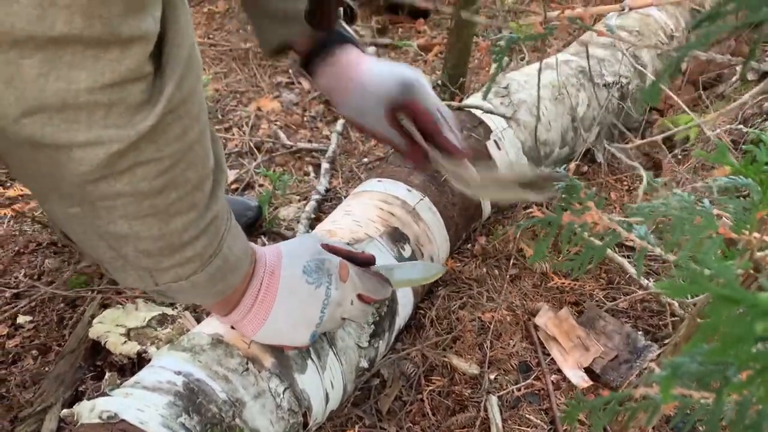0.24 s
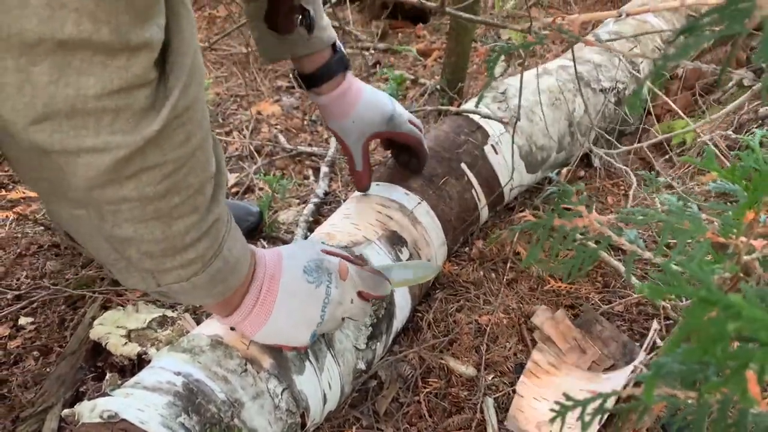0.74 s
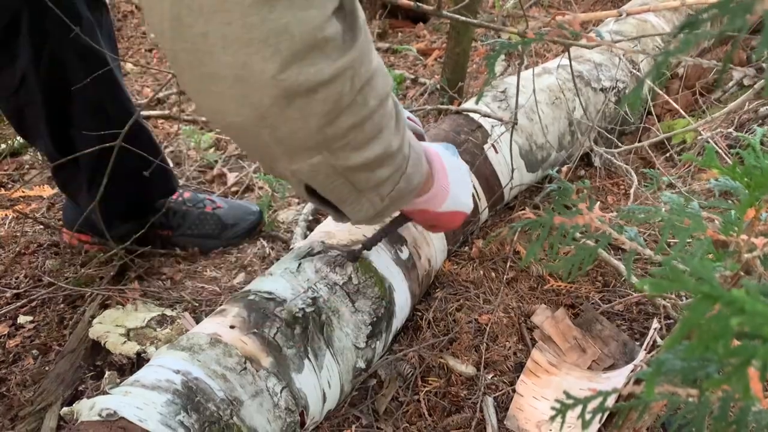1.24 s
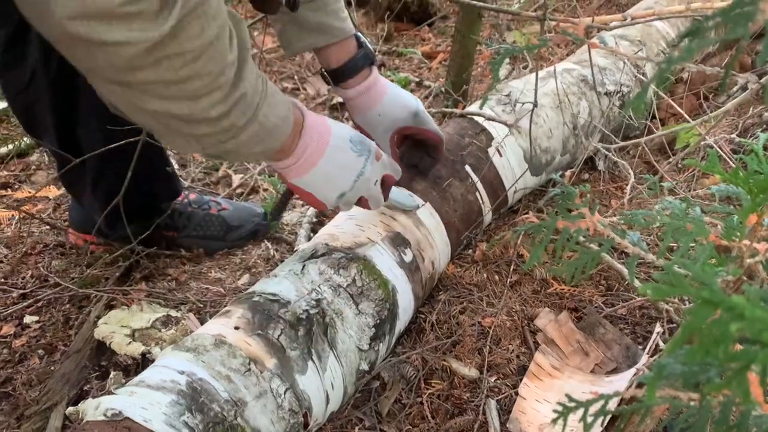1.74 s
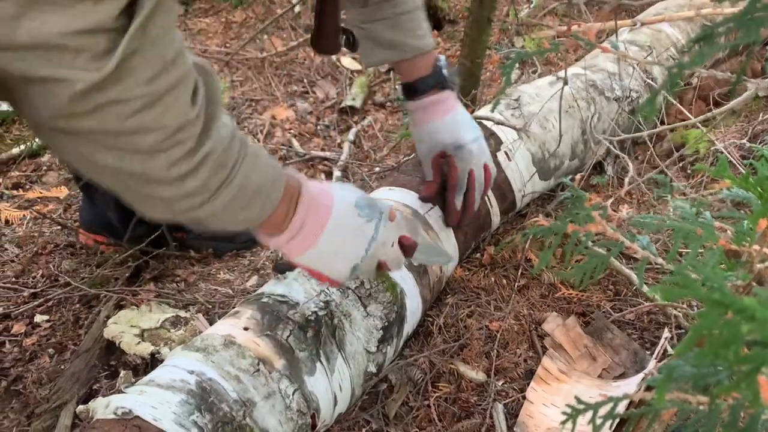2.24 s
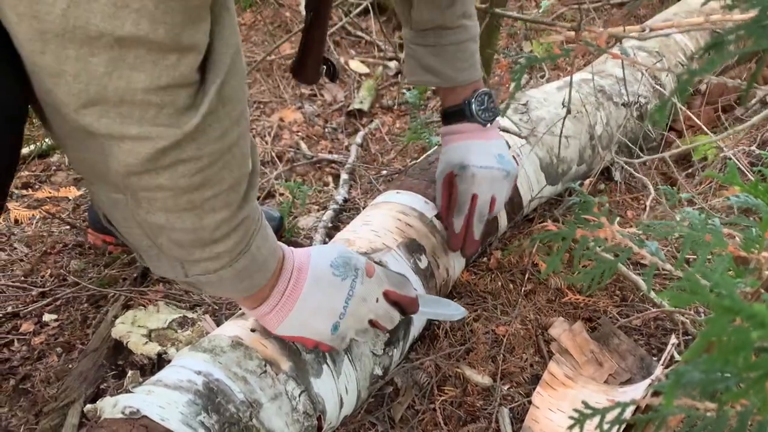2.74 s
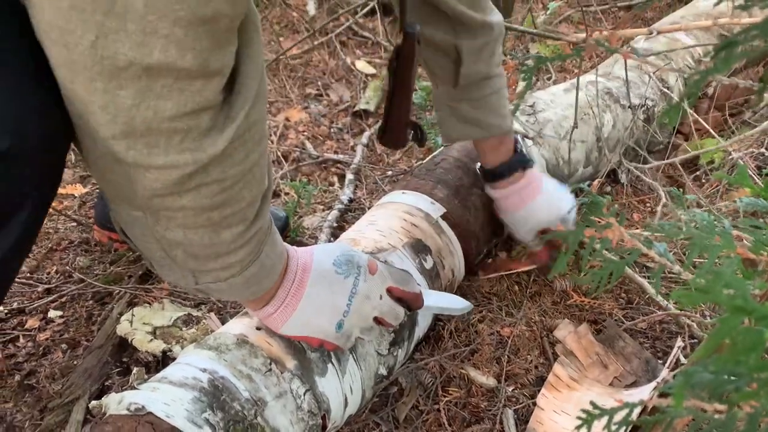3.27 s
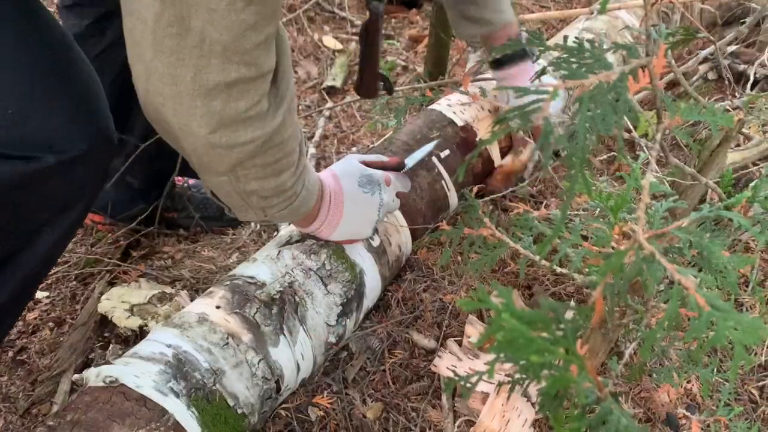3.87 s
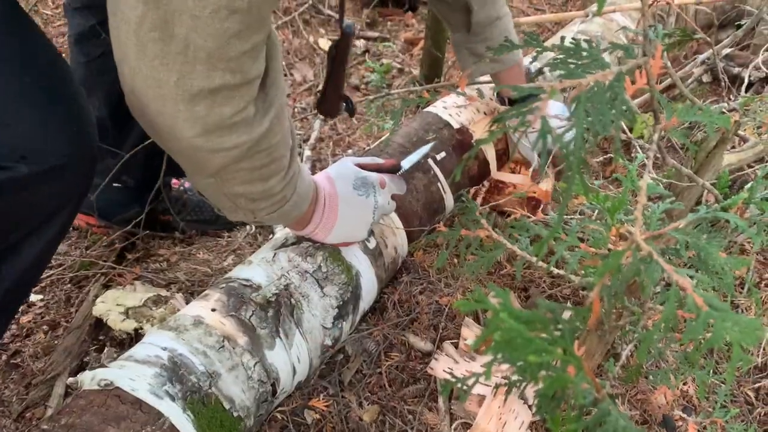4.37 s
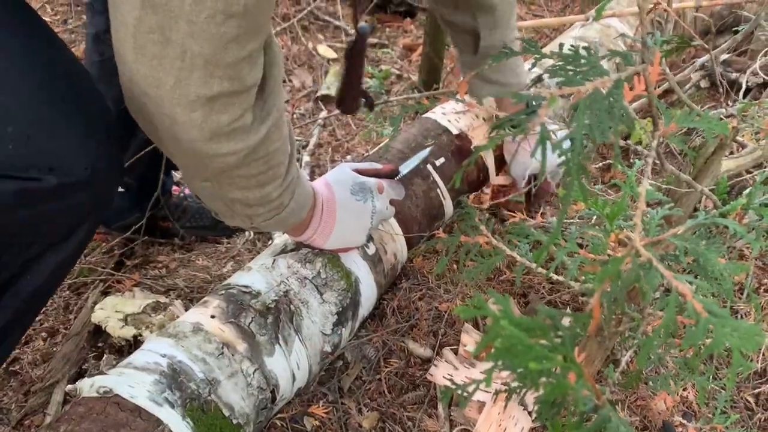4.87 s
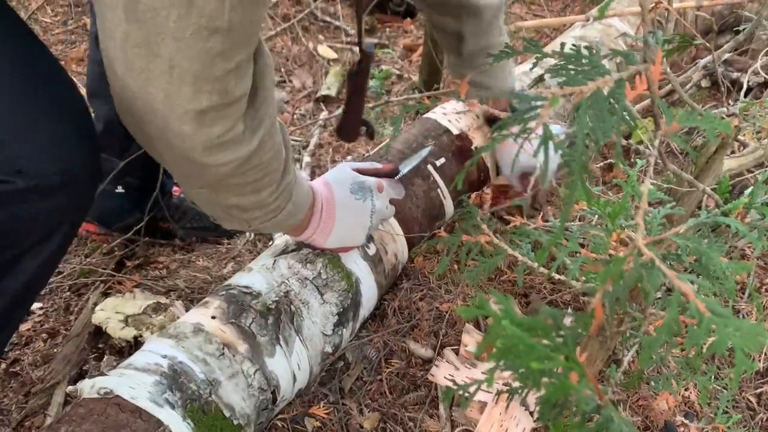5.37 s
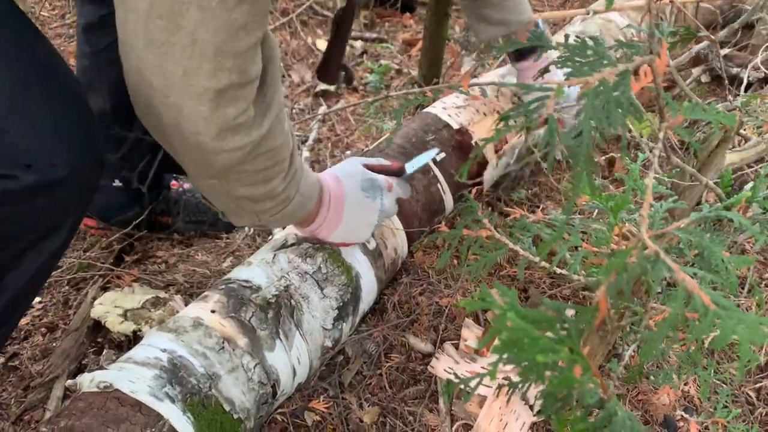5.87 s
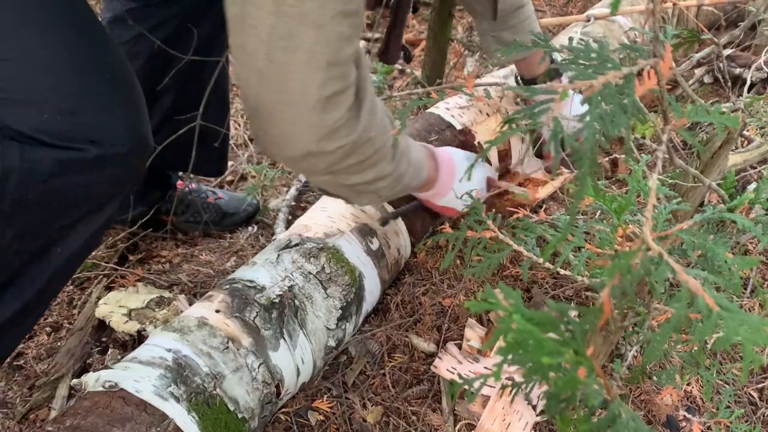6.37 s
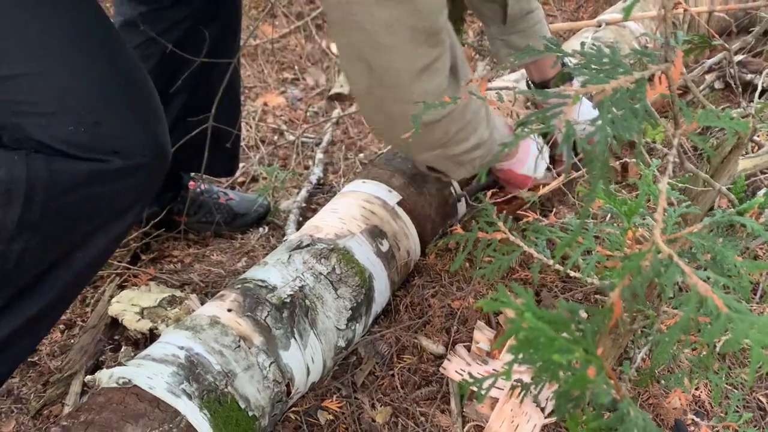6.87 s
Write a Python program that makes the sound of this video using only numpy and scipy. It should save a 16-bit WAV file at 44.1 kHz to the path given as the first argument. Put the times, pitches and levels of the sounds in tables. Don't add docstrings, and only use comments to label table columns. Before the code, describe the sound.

Dry birch bark is cut and peeled from a log, sparse snaps and rustles giving way to thick irregular bursts of crackling fibres in quiet woods.

```python
import sys
import numpy as np
from scipy import signal
from scipy.fft import rfft, irfft, next_fast_len
from scipy.io import wavfile
from scipy.ndimage import uniform_filter1d

SR = 44100
rng = np.random.default_rng(int(sys.argv[2]) if len(sys.argv) > 2 else 0)


def waveform_to_disk(signal):
    frames = np.transpose(np.atleast_2d(signal))
    scaled = np.clip(frames, -1, 1) * 32767
    samples = np.round(scaled).astype(np.int16)
    wavfile.write(sys.argv[1], SR, samples)


def natural_amplitude(level_db):
    exponent = np.asarray(level_db, float) / 20
    return 10 ** exponent


N = 313992

# (time [s], crack peak [dB], sheet above crack [dB], knock above crack [dB], length [ms])
SNAPS_AT_LOG = [(0.089, -46.5, 5, 1, 1.8), (0.4125, -35.5, 3.5, -9, 5.4), (0.4689, -37.5, 11, 3, 2.3),
                (1.337, -51, 11.5, 7.5, 4.5), (2.0107, -56, -13, -6, 2.5), (3.071, -43, -15, -6, 2.6),
                (3.254, -25, -12.5, -11, 4.9), (3.8189, -25, -1.5, -15, 3.1), (4.0933, -42.5, -36, -5, 6),
                (4.381, -45, -0.5, 1.5, 2.1), (4.4283, -31.5, -8.5, -4.5, 6.3), (4.4674, -29, 2.5, 4, 1.2),
                (4.7893, -20, -12, -14.5, 2.6), (4.842, -26, -16, -15, 1.1),
                (4.852, -24.5, -7.5, -16.5, 5.7), (5.0673, -13, -8, -18.5, 2.5),
                (5.3813, -29, -31.5, 5, 2.4), (5.391, -27, -15, 0, 8.1), (6.458, -19, -13, -14, 2.2),
                (6.502, -34.5, -5, -4, 16), (6.5457, -33, -7.5, -9, 8.9), (6.6621, -38, -8, 1, 0.92),
                (6.992, -37, -17, -19, 4.3), (7.037, -16.5, -17, -11.5, 1.1)]
SNAPS_MIDWAY = [(1.8485, -33.5, -0.5, -10.5, 5.5), (1.8845, -15.5, -1.5, -12, 3.9),
                (1.972, -59, -8, 10.5, 1.5), (2.177, -57.5, -15, 4, 2.8), (2.305, -53, -10, 9, 0.91),
                (2.681, -44, -8, -4, 1.9), (3.0343, -42.5, 0, -12, 7.1), (3.826, -25, -8, -6, 2.8),
                (3.834, -24.5, -8.5, -11.5, 4.5), (3.997, -25, -17.5, -18, 18), (4.0205, -20, -7, -10, 1.1),
                (4.2984, -29.5, -15, -7, 3.7), (4.4102, -37.5, -15, -40, 0.88),
                (4.9018, -30.5, -10, -12.5, 3.9), (4.9732, -35, -16, -20, 1.5),
                (5.1835, -44.5, -10, 12, 3.3), (5.268, -29, -3, -4, 0.38), (5.5285, -34, -3.5, -7.5, 1.8),
                (6.2099, -29, -0.5, -15.5, 1.22), (6.2476, -25, -2.5, -5.5, 1),
                (6.3321, -24.5, -8, -6, 2.1), (6.473, -28, -11, -10, 1.7), (6.528, -18.5, -6, -14.5, 1.1),
                (7.0692, -24.5, -2.5, -8.5, 0.93)]
SNAPS_AT_EDGE = [(0.869, -30.5, -11.5, -6.5, 9.2), (1.558, -37.5, -0.5, -8, 3.9),
                 (2.392, -28.5, -11, -12.5, 4.4), (3.027, -47, 6.5, -13.5, 8.6),
                 (3.1443, -41.5, 1, -7, 4.9), (4.066, -35, -22, -13, 3.9), (4.212, -32.5, -15, -12.5, 2.7),
                 (4.656, -49, 3, -0.5, 10), (4.7841, -18.5, -5, -12, 0.47),
                 (4.8009, -16, -10.5, -8.5, 0.81), (4.8299, -23.5, -13, -10, 1.1),
                 (4.867, -40, -1, 7.5, 1.1), (4.8735, -34, -17, 0, 3.8), (4.9959, -28, -8.5, -9.5, 1.2),
                 (5.043, -40, -13, -13, 3.3), (5.056, -16.5, -8, -7.5, 0.26), (5.0803, -26, -12, -7, 1.8),
                 (5.164, -37, -13, -8, 3.2), (5.23, -46, 0, 2.5, 11), (5.913, -33.5, 0.5, -1, 4.9),
                 (5.9552, -34.5, -2.5, -14, 5.6), (6.176, -29.5, -5, -11, 2.74), (6.226, -15, -4, -9, 1.8),
                 (7.029, -13, -12.5, -17.5, 1.4)]
# (time [s], crack peak [dB], sheet above crack [dB], length [ms])
TEARS = [(0.1063, -29, 2, 15), (0.1417, -39, 0, 13), (0.1587, -31, -14, 29), (0.2125, -28, -18, 10),
         (2.4721, -27, -12, 7.7), (3.398, -36.5, -6, 5.5), (3.4232, -41, -3, 2.4),
         (3.923, -34.5, -1.5, 3.5), (3.941, -32, -29, 32), (4.54, -34, -3, 6.6), (6.2156, -29, -13, 4.5)]
# (time [s], peak [dB], length [ms])
TICKS = [(.238, -30.5, 8.4), (0.252, -38, 4.1), (0.648, -51, 3.9), (.722, -51.5, 3), (0.8533, -28, 1.8),
         (0.972, -48.5, 2.5), (1.526, -48.5, 1.9), (2.2452, -40, 4), (2.284, -29, 2.1),
         (2.3851, -29.5, 0.82), (2.5248, -40.5, 3.3), (3.1172, -34, 1.9), (3.1947, -30.5, 2.1),
         (3.211, -19.5, 2.4), (3.239, -25.5, 0.49), (3.77, -47, 3.3), (3.879, -34, 2.1), (3.8867, -38, 2.6),
         (3.917, -24, 4.1), (4.1526, -35, 2.2), (4.1643, -16, 1.1), (4.183, -34, 1.6), (4.2272, -17.5, 1.4),
         (4.588, -35, 0.91), (5.049, -33, 1.7), (5.502, -38.5, 2.63), (6.3577, -33.5, 2),
         (6.5115, -18.5, 0.98), (6.266, -38, 1.5), (6.222, -33, 1.2), (2.270, -43.5, 2.5),
         (2.279, -39, 1.6), (2.47, -26, 0.81), (2.491, -33, 2.2), (4.879, -34.5, 1.2), (6.927, -46, 1.3),
         (6.957, -45, 2), (7.0175, -26.5, 1.5), (7.024, -31, 1.5), (7.059, -36, 1.5), (7, -28, 1.2),
         (7.0131, -16.5, 0.87)]
# (time [s], peak [dB], pitch [Hz],
# length [ms])
LOW_CHIPS = [(0.362, -49, 888, 3.1), (0.44, -33.5, 1340, 4), (1.428, -49, 900, 1.6), (3.07, -62, 560, 3),
             (3.328, -40, 548, 3.5), (3.34, -40, 814, 2.5), (3.953, -41, 1170, 4), (4.001, -33, 753, 5),
             (4.019, -21.5, 1190, 2.1), (4.067, -21.5, 970, 4.3), (5.04, -33.5, 1110, 3.4),
             (5.349, -38.5, 465, 4), (5.414, -34, 619, 2.7), (6.104, -48.5, 663, 6.2),
             (6.225, -21.5, 1136, 2.1), (6.478, -35, 396, 4.3), (6.515, -30, 860, 6.6)]
MID_CHIPS = [(0.18, -34, 2410, 4), (0.3853, -30, 1790, 3.6), (0.411, -29, 4190, 8.9),
             (0.4412, -27, 3560, 3.9), (0.4665, -26, 1840, 0.92), (0.4943, -40.5, 3800, 3),
             (1.4282, -48.5, 2900, 2.5), (1.5395, -50, 2100, 1.5), (1.7937, -40, 2370, 3.7),
             (1.8402, -27, 2840, 2.7), (2.807, -42, 3110, 4.9), (2.9766, -41.5, 1894, 3.4),
             (3.0044, -34, 3450, 3.3), (3.026, -30, 3200, 1.5), (3.039, -47.5, 2400, 3),
             (3.0874, -40, 3660, 3), (3.106, -47, 2420, 3), (3.2092, -22.5, 4560, 2.1),
             (3.2974, -45, 2120, 2.8), (3.3237, -33.5, 4080, 1.3), (3.358, -37, 4140, 1.5),
             (4.0192, -19, 3545, 2.1), (4.4637, -20, 3400, 1.4), (5.0413, -42, 1570, 3),
             (5.359, -35.5, 3900, 3), (5.3905, -26, 4040, 4), (5.4144, -40, 3200, 3.3),
             (5.427, -46.5, 3060, 3), (5.439, -41, 3450, 4.2), (6.0076, -32.5, 3000, 2.3),
             (6.102, -42.5, 4200, 4.3), (6.1753, -23.5, 1960, 3), (6.2247, -18.5, 1504, 2.1),
             (6.5131, -30, 2780, 2.6), (6.5273, -27.5, 2510, 3.3), (7.0126, -32.5, 3570, 3),
             (7.0261, -20.5, 3390, 3.7), (7.0677, -27.5, 3770, 2.5)]
HIGH_CHIPS = [(0.853, -20, 7410, 2.1), (0.8693, -23.5, 7260, 2.2), (1.4666, -55.5, 5970, 2.5),
              (3.292, -37, 6590, 1.2), (3.449, -39, 9500, 1.5), (3.7716, -36, 4700, 2.5),
              (3.7877, -33.5, 5000, 2.5), (3.7974, -33, 4700, 2.5), (3.805, -29, 5000, 2.5),
              (3.9029, -40, 7400, 2.5), (3.9815, -27, 7670, 3), (4.0003, -27, 4500, 4),
              (4.777, -28.5, 6470, 1.9), (4.8101, -27, 4710, 2.2), (5.3496, -36, 5500, 1.8),
              (6.257, -37, 6300, 1.5)]
DEEP_CHIPS = [(1.8838, -14.5, 2523, 1.7), (1.884, -14, 10300, 1.7), (2.027, -54, 220, 5.2),
              (2.388, -45, 451, 2.7), (2.76, -50, 325, 8.1), (3.8254, -22, 1480, 3.4),
              (3.832, -30, 1450, 2.3), (4.299, -38.5, 288, 10), (5.53, -49, 350, 8.4),
              (6.913, -52, 350, 12), (1.337, -35, 1250, 2.3), (1.558, -38.5, 1212, 4.1),
              (2.684, -39, 1646, 1.8), (3.93, -37, 4200, 3), (3.948, -34.5, 3320, 3),
              (4.165, -29.5, 1170, 2.2), (6.225, -21, 1990, 3), (0.142, -29, 2575, 14),
              (2.122, -51, 2010, 5.5), (2.481, -31.5, 6420, 3), (3.013, -38, 2090, 10),
              (3.036, -34, 1860, 4.2), (3.055, -47, 2150, 10), (4.068, -31, 898, 5.7),
              (4.183, -45, 2200, 1.8), (4.214, -34, 3970, 3), (6.175, -28.5, 1490, 3.2),
              (6.662, -37, 1973, 2.9), (1.886, -34, 394, 4.6), (7.029, -24.5, 1006, 3.4),
              (6.482, -36.5, 9000, 1.5), (5.754, -46, 2380, 3), (6.015, -39.5, 2470, 7.4)]
# (time [s], peak [dB], pitch [Hz], length [s])
THUDS = [(0.072, -53.5, 123.4, 0.19), (.36, -56, 167, 0.15), (0.467, -43.5, 179, 0.053),
         (1.887, -41, 110, 0.017), (3.253, -47.5, 82, 0.061), (3.35, -45, 128, 0.04),
         (3.389, -49, 67, 0.058), (4.068, -39.5, 146, 0.025), (4.314, -50, 109.5, 0.068),
         (4.464, -36, 154, 0.034), (5.059, -43, 103, 0.039), (5.097, -55, 82.5, 0.068),
         (5.387, -40, 78, 0.08), (6.329, -56, 117, 0.048), (6.459, -48.5, 134, 0.072),
         (6.659, -54.5, 151, 0.033), (7.036, -49, 132, 0.038), (7.065, -43, 142, 0.027)]

# (peak time [s], peak [dB], time to climb 20 dB [s], time to fall 20 dB [s])
RUSTLES = [(.3838, -41, 0.03, 0.1264), (.85, -47.5, 0.05, 0.1), (2.5, -61, 0.1, 0.45),
           (3.2, -59, 0.1, 0.65), (3.261, -53.5, 0.22, 0.1), (3.764, -48.5, 0.002, 0.46),
           (3.98, -51.5, 0.22, -0.08), (5.78, -47.5, 0.26, 0.03), (5.901, -50, 0.16, 0.28),
           (6.108, -46.5, -0.11, -0.1), (6.52, -48, 0.07, 0.1243), (6.91, -60.5, -0.22, 1),
           (.81, -54, 0.06, -0.02), (2.1, -58, -0.54, .08)]
SCRAPES = [
    (.43, -48, 0.06, 0.11),
    (1.36, -63, 0.094, 0.21),
    (1.8, -48.5, 0.015, 0.21),
    (2.8, -59.5, 0.18, 0.061),
    (3, -48.5, 0.036, 0.057),
    (3.03, -52, 0.044, 0.11),
    (3.12, -52.5, 0.057, 0.041),
    (.56, -64.5, .06, 0.36),
    (6.41, -55, 0.052, 0.06),
    (7.075, -48.5, 0.086, 0.025),
]
DRAGS = [
    (.14, -47.5, 0.32, 0.26),
    (1.881, -45, 0.073, 0.022),
    (3.659, -56, 0.076, 0.1),
    (6.019, -48.5, 0.089, 0.033),
    (6.232, -38, 0.033, 0.034),
]
BENDS = [(6.88, -68.5, 0.084, 0.12), (3.828, -42.5, 0.033, 0.049), (4.03, -52.5, 0.15, 0.088),
         (4.31, -65.5, 0.01, 0.94), (4.46, -52, 0.1, 0.14), (4.77, -49.5, 0.031, 0.18),
         (4.84, -50.5, 0.081, 0.042), (5.061, -49, 0.073, 0.069), (5.19, -46.5, 0.04, 0.12),
         (5.389, -41.5, 0.06, 0.053), (5.68, -56.5, 0.063, 0.14), (5.78, -58, 0.074, 0.083),
         (6.459, -54, 0.03, 0.18), (6.669, -78, 0.026, 0.013)]
CURL_SLIDES = [
    (.6, -68, .16, .42),
]
# (time [s], level [dB])
GLOVES = [(0, -90), (.56, -73), (.68, -80), (1.08, -66.5), (1.28, -85), (1.48, -74), (1.78, -69),
          (2.0, -65), (2.42, -57), (2.6, -71.5), (2.95, -81.5), (3.4, -58), (3.75, -84), (4.2, -64),
          (4.29, -72), (6.3, -61.5), (6.76, -77.5), (7.12, -62.5)]

# (frequency [Hz], level [dB])
PAPER = [(2500, -29), (4200, -5.5), (6500, -2), (9000, 2.5), (12000, -2), (15300, -1.5), (16000, -8),
         (16900, -50), (17200, -120)]
SHEET = [(800, -45), (1500, -3.5), (2100, 0.5), (2800, -2), (3600, 2), (4300, -4), (7000, -14)]
FLEX = [(50, -21.5), (250, -7.5), (400, 0.5), (800, 0.5), (1200, 3), (1600, -4), (3000, -28)]
CHIP = [(150, -33), (350, -7), (12000, 8), (16500, -5), (17200, -120)]
LOG = [(30, -64), (60, -2.5), (110, -7), (200, -11), (450, -6.5), (900, -59)]
WOOD = [(30, 9), (79, 1), (1460, -14), (3580, -11.5), (8740, -26.5), (15200, -46), (16300, -67)]
# (frequency [Hz], likeness [0-1])
NEAR = [(700, 0.98), (1700, 0.81), (3200, 0.56), (5600, 0.85), (7600, 0.26)]
FAR = [(100, 0.81), (400, 0.3), (1400, 0.064), (5600, .15), (7600, 0.91)]
# (frequency [Hz], phase [radians])
PORT_LEAD = [(0, 0), (800, .3), (1900, -.6), (2800, 1.1), (4200, .75), (5300, 1.8), (6000, 0), (7000, -.1),
             (8620, -3.14), (15500, -16.7), (22050, -16.7)]
# (frequency [Hz], left minus right [dB])
PORT_SHADE = [(700, 0), (1600, 3), (3100, 0), (4500, 1.5), (6000, -3), (6900, -7), (7600, 5)]

KNOCK_HZ = (422, 763.4, 1203.4)
LEAD_IN = 256
SAME_HZ = 8150


def fibres():
    dry_knock_db = -26.5
    rows = [(s, db, -15.5, dry_knock_db, KNOCK_HZ[1], ms) for s, db, ms in TICKS]
    rows += [(s, db, sheet_db, dry_knock_db, KNOCK_HZ[2], ms) for s, db, sheet_db, ms in TEARS]
    for table, hz in zip((SNAPS_AT_LOG, SNAPS_MIDWAY, SNAPS_AT_EDGE), KNOCK_HZ):
        rows += [(s, db, sheet_db, knock_db, hz, ms) for s, db, sheet_db, knock_db, ms in table]
    return np.transpose(rows)


def snaps():
    s, db, sheet_db, knock_db, hz, ms = fibres()
    s, length = s - LEAD_IN / SR, ms / 1000
    chance = rng.random((len(s), 3))
    hz = hz * (1 + 0.053 * (2 * chance[:, 2] - 1))
    rasp = 0.027 * ms[:, None, None]
    buzz_width = 1.6 / ms[:, None, None]

    crack_shape = swell(0.7 * length, rise=0.4, fall=0.67, tail_db=-15.5, tail_t60=0.061, spike=2.26)
    crack = struck(crack_shape, 4500 * 1.4 ** chance[:, 0], PAPER, ring_share=0.048, width=3.5)
    sheet_shape = swell(0.78 * length, rise=0.31, fall=0.78, tail_db=-15.0, tail_t60=0.064, spike=1.28)
    sheet = struck(sheet_shape, 2400 * 1.2 ** chance[:, 1], SHEET, ring_share=rasp, width=buzz_width)
    knock_shape = swell(0.64 * length + 0.57 / hz, rise=0.21, fall=0.6, tail_db=-17.5, tail_t60=0.057, spike=0)
    knock = struck(knock_shape, hz, FLEX, ring_share=0.67, width=0.4)

    cracks = laid(s, db + 5.5, crack)
    slaps = laid(s + .0003, db + sheet_db + 2.0, sheet)
    knocks = laid(s + 0.58 / hz, db + knock_db + 3.5, knock)
    return cracks + slaps + knocks


def chips():
    s, db, hz, ms = np.transpose(LOW_CHIPS + MID_CHIPS + HIGH_CHIPS + DEEP_CHIPS)
    length = 0.5 * ms / 1000 + 0.5 / hz
    shape = swell(length, rise=0.2, fall=0.94, tail_db=-14.0, tail_t60=0.032, spike=0.61)[..., :1024]
    return laid(s + 0.000989 - LEAD_IN / SR, db - 1.5, struck(shape, hz, CHIP, ring_share=0.83, width=0.24))


def thuds():
    s, db, hz, length = np.transpose(THUDS)[..., None, None]
    t = np.arange(SR // 4) / SR
    u = t / (0.26 * np.clip(length, .01, .2))
    shape = u * np.exp(1 - u)
    thud = struck(shape, hz.ravel(), LOG, ring_share=0.54, width=0.38, sag_cycles=1.486)
    return laid(s.ravel(), db.ravel() + 0.5, thud)


def rubbing():
    gloves = natural_amplitude(np.interp(np.arange(N) / SR, *np.transpose(GLOVES)))
    pressures = np.array([strokes(RUSTLES), strokes(SCRAPES), strokes(DRAGS), strokes(BENDS), gloves])
    mixes_db = [(0.12, -7, -12),
                (-8, 0.067, -10),
                (0.1, -2.2, -8.5),
                (0.27, -3.5, 0.028),
                (0.1, -4, -7)]
    levels = np.sqrt(natural_amplitude(mixes_db).T ** 2 @ pressures ** 2)
    fine = grit(rate=400, scatter_db=4, t60=.01)
    coarse = grit(rate=160, scatter_db=4, t60=.025)
    paper_shape = 0.39 + 0.41 * fine
    sheet_shape = 0.8 + 0.35 * fine + 0.2 * coarse
    flex_shape = 0.5 + .2 * fine + 0.49 * coarse
    total = 0
    for level, shape, colour in zip(levels, (paper_shape, sheet_shape, flex_shape), (PAPER, SHEET, FLEX)):
        total = total + level * unit(shape * coloured(patchy(depth_db=3.0), colour))
    return total


def curl():
    width_hz = 110
    rings = lambda f: sum(1 / (1 + ((f - hz) / width_hz) ** 2) for hz in (2960, 3860))
    return strokes(CURL_SLIDES) * unit(filtered(patchy(depth_db=5), rings))


def forest():
    return natural_amplitude(-73 + 0.5) * unit(coloured(patchy(depth_db=0.5), WOOD))


def strokes(rows):
    t = np.arange(N) / SR
    roundness = 1.196
    total = 0
    for s, db, rise, fall in rows:
        away = np.maximum((s - t) / max(rise, .002), (t - s) / max(fall, .002))
        total = total + natural_amplitude(db - 20 * away ** roundness)
    return total


def grit(rate, scatter_db, t60):
    sizes = natural_amplitude(scatter_db * np.minimum(rng.exponential(size=N), 2.2))
    ticks = (rng.random(N) < rate / SR) * sizes
    decay = natural_amplitude(-60 * np.arange(2048) / SR / t60)
    return unit(signal.fftconvolve(ticks, decay)[:N])


def patchy(depth_db):
    z = signal.stft(rng.standard_normal((2, N)), nperseg=256)[2]
    field = uniform_filter1d(rng.standard_normal(z.shape[1:]), size=8, axis=0)
    field = uniform_filter1d(field, size=8, axis=1)
    return signal.istft(z * natural_amplitude(depth_db * unit(field)), nperseg=256)[1][:, :N]


def swell(length, rise, fall, tail_db, tail_t60, spike):
    t = (np.arange(2048) - LEAD_IN) / SR
    length = np.clip(length, .0005, .02)[:, None, None]
    front = natural_amplitude(-9 * np.abs(t) / (length * np.where(t < 0, rise, fall)))
    front = front * (1 + spike * np.exp(-np.abs(t) / 0.00031))
    return front + (t > 0) * natural_amplitude(tail_db - 60 * np.abs(t) / tail_t60)


def struck(shape, hz, spectrum, ring_share, width, sag_cycles=0):
    hz, t = hz[:, None, None], np.arange(shape.shape[2]) / SR
    around = lambda f: natural_amplitude(along(spectrum, f)) / np.sqrt(1 + ((f - hz) / (width * hz)) ** 2)
    noise = filtered(shape * rng.standard_normal((len(hz), 2, shape.shape[2])), around)
    sag = sag_cycles * (1 - np.exp(-t / .012))
    phase = 2 * np.pi * (hz * t + sag + rng.random((len(hz), 2, 1)))
    return noise / np.abs(noise).max(axis=2, keepdims=True) + ring_share * shape * np.sin(phase)


def laid(times, gains_db, sounds):
    peaks = np.abs(sounds[:, 0]).max(axis=1)
    sounds = sounds * (natural_amplitude(gains_db) / peaks)[:, None, None]
    at = (np.round(times * SR).astype(int)[:, None] + np.arange(sounds.shape[2])).ravel()
    return np.array([np.bincount(at, sounds[:, c].ravel(), N + SR)[:N] for c in (0, 1)])


def along(points, hz):
    f, v = np.transpose(points)
    return np.interp(np.log(hz + 1), np.log(f + 1), v)


def unit(x):
    return x / np.sqrt(np.mean(x ** 2) + 1e-20)


def filtered(x, response):
    n = x.shape[-1]
    m = next_fast_len(n + 2048)
    return irfft(rfft(x, m) * response(np.fft.rfftfreq(m, 1 / SR)), m)[..., :n]


def coloured(x, spectrum):
    return filtered(x, lambda hz: natural_amplitude(along(spectrum, hz)))


def spread(pair, alike, scatter=1, treble=1, same_hz=SAME_HZ):
    def shares(hz):
        likeness = np.clip(np.where(hz < same_hz, along(alike, hz), treble), 0, 1)
        turn = np.arccos(likeness ** scatter) / 2
        return np.array([np.cos(turn), np.sin(turn)])

    mid, side = filtered(pair, shares)
    return np.array([mid + side, mid - side])


def scene():
    breaks = spread(snaps() + thuds() + chips(), NEAR, treble=0.82)
    rub = rubbing()
    moved = np.clip((np.arange(N) / SR - 3.05) * 10 + .5, 0, 1)
    rub_before = spread((rub + curl()) * (1 - moved), NEAR, scatter=5.4)
    rub_after = spread(rub * moved, NEAR, scatter=2.5, same_hz=9000)
    return breaks + rub_before + rub_after + spread(forest(), FAR)


def low_pass(x):
    return signal.sosfilt(signal.butter(12, 16980, fs=SR, output="sos"), x)


def record(dry):
    f, lead = np.transpose(PORT_LEAD)

    def half(hz):
        shade = natural_amplitude((hz < SAME_HZ) * along(PORT_SHADE, hz) / 2)
        return shade * np.exp(.5j * np.interp(hz, f, lead))

    band = lambda hz: (hz < 16950) / (1 + (48 / (hz + 1)) ** 4)
    ports = filtered(dry, lambda hz: band(hz) * np.array([half(hz), 1 / half(hz)]))
    return low_pass(ports)


dry = scene()
out = record(dry)
waveform_to_disk(out)
```